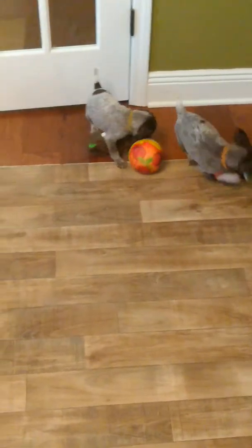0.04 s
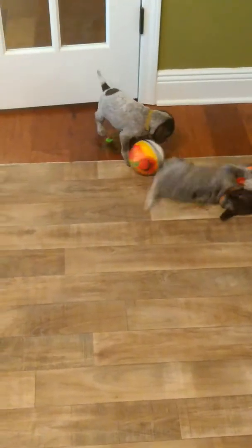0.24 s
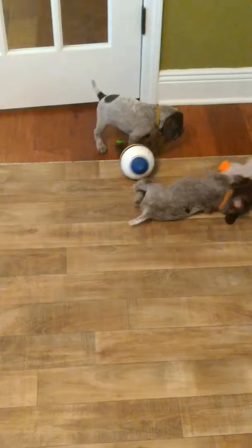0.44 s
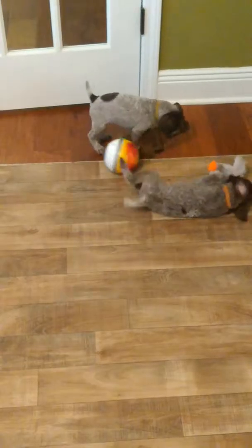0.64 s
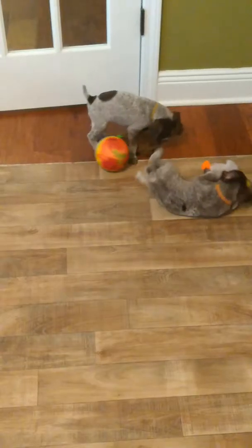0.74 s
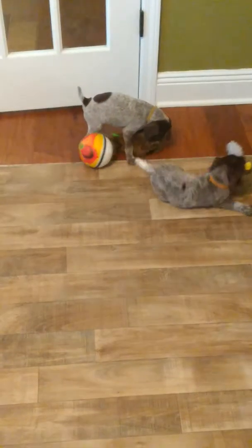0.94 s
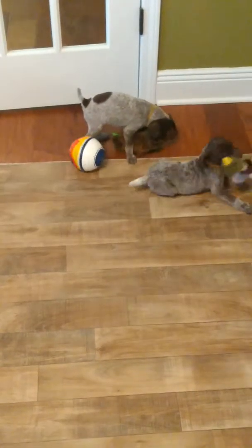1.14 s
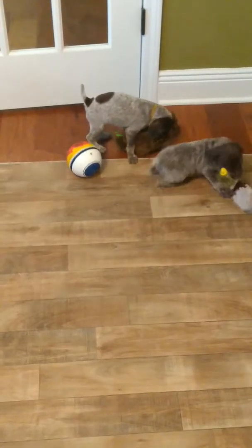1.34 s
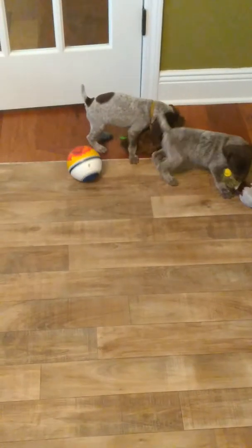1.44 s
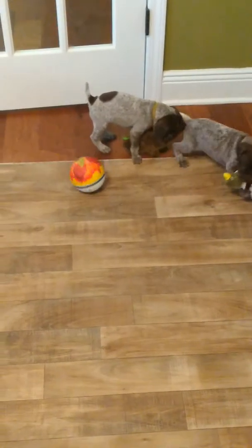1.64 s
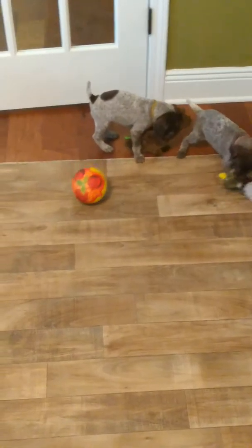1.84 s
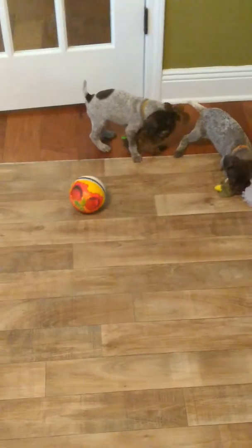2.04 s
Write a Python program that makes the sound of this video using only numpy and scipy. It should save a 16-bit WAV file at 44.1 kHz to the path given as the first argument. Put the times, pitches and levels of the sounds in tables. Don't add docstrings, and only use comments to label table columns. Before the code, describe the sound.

Puppies' claws tick and scuffle over a hard indoor floor, a hollow toy knocking once in a lively room.

```python
import sys
import numpy as np
from scipy import signal
from scipy.fft import rfft, irfft
from scipy.io import wavfile

SR = 44100
rng = np.random.default_rng(int(sys.argv[2]) if len(sys.argv) > 2 else 0)


def put_to_file(sound):
    columns = np.atleast_2d(sound).T
    safe = np.clip(columns, -1, 1)
    whole_steps = np.round(safe * 32767)
    wavfile.write(sys.argv[1], SR, whole_steps.astype(np.int16))


def to_linear_factor(level_db):
    exponent = np.asarray(level_db, float) / 20
    return 10 ** exponent


N = 92610

# start [s], claw peak [dB], pad level [dB], fizz level [dB], pad pitch [Hz].
PAW_CONTACTS = [(.0791, -30.5, -37, -55, 557), (.1066, -37, -42, -44.5, 850), (.111, -41, -58, -59, 450),
                (.2202, -30, -35, -47.5, 517), (.225, -49, -43, -45, 307), (.2792, -60, -39, -65, 395),
                (.3175, -33, -48, -46.5, 610), (.322, -35, -48, -49, 513), (.352, -36.5, -62, -69, 500),
                (.9736, -35.5, -55, -64, 390), (.9765, -36.5, -60, -57, 400), (.9935, -36, -68, -52.5, 412),
                (1.227, -31.5, -30.5, -48, 350), (1.5632, -53, -55, -82, 540),
                (1.6318, -47, -40.5, -74, 450), (1.6713, -27.5, -31, -44, 475),
                (1.6818, -25, -45.5, -41, 432), (1.705, -50, -43, -52, 505), (1.74, -44, -45, -69, 650),
                (1.802, -36, -50, -48, 540)]
# frequency [Hz], level [dB], t60 [s].
CLAW_MODES = [(1610, -7, 0.0032), (1970, -12, 0.0025), (2867, -1.5, 0.004), (3148, 7, 0.0023),
              (4560, -2.5, 0.0028), (5620, -4, 0.0021), (6770, -17.5, 0.0024)]
# start [s], level [dB].
KNOCK_BLOWS = [
    (.3508, -19.5),
    (0.3539, -11.5),
    (0.3557, -9),
    (.3735, -17),
    (.382, -41),
    (.389, -18.5),
    (.397, -21),
    (.404, -20.5),
    (.412, -21),
    (.429, -21),
]
# frequency [Hz], level [dB], t60 [s].
BOARD_MODES = [(151, -34, 0.46), (296, 1, 0.36), (354, -32, 0.15), (376.3, -7, 0.5), (413.4, 7, 0.14),
               (562, -33, 0.29), (686, -8.5, 0.58), (700, -27, 0.11), (885, -10, 0.08), (1220, -18, 0.49),
               (1280, -29, 0.43), (1270, -56, 0.66)]
# start [s], level [dB], pitch [Hz], t60 [s].
SMALL_CONTACTS = [
    (1.4272, -35, 520, .014),
    (1.4276, -46, 850, .006),
    (1.428, -49, 1250, .006),
    (.332, -40, 5250, .012),
    (1.683, -37, 2900, .014),
    (.4165, -40, 3060, .008),
    (.222, -41, 220, .03),
    (.36, -41, 152, .12),
    (1.083, -46, 230, .03),
    (2.042, -46, 300, .03),
]
# time [s], level [dB].
SCUFFLE_EFFORT = [(0, -53), (.04, -50.5), (.07, -51), (.29, -49), (.48, -55.5), (.78, -62.5), (.95, -68.5),
                  (1.04, -62), (1.11, -59), (1.2, -66.5), (1.31, -60), (1.45, -65), (1.54, -61),
                  (1.63, -65.5), (1.75, -53), (1.85, -54.5), (1.971, -62.5), (2.1, -74)]
# frequency [Hz], density [dB per Hz].
SCUFF_SPECTRUM = [(200, 1), (600, -5.5), (1500, -2.5), (3000, -1), (5000, -2.5), (7500, -10), (9000, -8.5),
                  (15000, -8.5)]
# frequency [Hz], density [dB per Hz].
AIR_SPECTRUM = [(30, -4), (55, 4.5), (78, -20), (150, 1), (800, -12), (1700, -20), (3000, -20.5),
                (15000, -64)]
# centre [Hz], width [Hz], level [dB].
HUM_BANDS = [(100.8, 12.3, -54), (119.3, 21.4, -59.5), (265.3, 18, -58), (152.4, 9.6, -68)]
# frequency [Hz], t60 [s].
REVERB_TIME = [(150, 0.99), (400, 0.54), (1000, 0.89), (3000, 0.4), (8000, 0.45), (15000, 0.23)]
# frequency [Hz], level [dB].
PORT_CROSS = [(1000, 0), (2200, 2), (4400, -2), (9000, -3), (15000, -14)]
# frequency [Hz], level [dB].
RIGHT_OVER_LEFT = [(35, -9), (70, -6.5), (130, -6.5), (300, -5.5), (2000, 2), (4500, 3.5), (8000, 3),
                   (14000, -0.5)]
DC_OFFSET = [
    [.00785],
    [-.0003],
]


def paws():
    scrapes_per_paw, scrape_s = 12, 0.0036
    s, claw_db, pad_db, fizz_db, pad_hz = np.transpose(PAW_CONTACTS)
    late, size, side = rng.random((len(s), 3, scrapes_per_paw)).transpose(1, 2, 0)

    click_s = s + 0.001228 - scrape_s * np.log(1 - 0.95 * late)
    claw_gain = to_linear_factor(claw_db - 5)
    click_gain = (size + 0.5) * np.sign(side - 0.5) * claw_gain
    near_claws = claw(train(click_s.ravel(), click_gain.ravel()))
    far_claws = claw(train(s, claw_gain))

    fizz_hz, fizz_s = 7200, 0.003
    bright = signal.butter(4, fizz_hz, "high", fs=SR, output="sos")
    fizz = train(s + 0.00099, to_linear_factor(fizz_db + 12.5))
    fizz_envelope = signal.lfilter([1], [1, -np.exp(-1 / (fizz_s * SR))], fizz)
    near_fizz = signal.sosfilt(bright, fizz_envelope * rng.standard_normal(N))
    far_fizz = signal.sosfilt(bright, fizz)

    pads = sum(pad(*touch) for touch in zip(s, pad_db, pad_hz))
    near = near_claws + near_fizz + pads
    far = to_linear_factor(11) * far_claws + to_linear_factor(2.5 + 17.5) * far_fizz + to_linear_factor(3.5) * pads
    return near, far


def claw(clicks):
    return sum((-1) ** k * to_linear_factor(db) * ring(clicks, hz, t60) for k, (hz, db, t60) in enumerate(CLAW_MODES))


def pad(s, db, hz):
    t60 = 0.018
    landing = train([s + 0.00088, s + 0.004028], to_linear_factor(db + 6.5) * np.array([0.4, 1]))
    return ring(landing, hz, t60) - 0.13 * ring(landing, 1.78 * hz, 0.27 * t60)


def knock():
    s, db = np.transpose(KNOCK_BLOWS)
    hard = train(s, to_linear_factor(db) * (-1.) ** np.arange(len(s)))
    softness = signal.butter(2, 990, fs=SR, output="sos")
    blow = signal.sosfilt(softness, hard)
    boards = 0
    for k, (hz, level_db, t60) in enumerate(BOARD_MODES):
        boards = boards + to_linear_factor(level_db - 21) * (-1) ** k * ring(blow, hz, t60)
    body = ring(blow, 482, 0.016) - 0.1 * ring(blow, 696, 0.011) + 0.55 * ring(blow, 1154, 0.004)
    crack = to_linear_factor(-17) * claw(hard)
    return body, boards, crack


def ticks():
    out = 0
    for s, db, hz, t60 in SMALL_CONTACTS:
        swell = ring(ring(train([s], np.ones(1)), hz, t60), hz, t60)
        out = out + peak_one(swell) * to_linear_factor(db)
    return out


def scuffle():
    grains_per_s = 2600
    s, db = np.transpose(SCUFFLE_EFFORT)
    size_db = np.minimum(rng.exponential(1, (2, N)), 5)
    sizes = to_linear_factor(size_db) * rng.standard_normal((2, N))
    grains = sizes * (rng.random((2, N)) < grains_per_s / SR)
    grains = grains + 0.5 * rng.standard_normal((2, N))
    effort = to_linear_factor(4 + np.interp(np.arange(N) / SR, s, db))
    return rms_one(colour(grains, SCUFF_SPECTRUM)) * effort


def room(x):
    t, tail = np.arange(SR) / SR, 0
    edges = 60 * 2. ** np.arange(0, 8.6, 0.5)
    white = rng.standard_normal((2, 2, SR))
    for k, (low, high) in enumerate(zip(edges, edges[1:])):
        t60 = in_hz(REVERB_TIME, np.sqrt(low * high))
        band_pass = signal.butter(2, [low, min(high, 20000)], "band", fs=SR, output="sos")
        band = signal.sosfilt(band_pass, white[k % 2])
        equal_energy = np.sqrt(2 * np.log(1000) / (t60 * SR))
        tail = tail + band * to_linear_factor(-60 * t / t60) * equal_energy
    gap_s = 0.0015
    tail = tail * np.clip(t / gap_s - 1, 0, 1)
    return signal.fftconvolve(x[None], tail, axes=1)[:, :N]


def room_tone():
    out = to_linear_factor(-53.5) * rms_one(colour(rng.standard_normal((2, N)), AIR_SPECTRUM))
    hz = np.fft.rfftfreq(N, 1 / SR)
    for centre_hz, width_hz, db in HUM_BANDS:
        resonance = 1 / (1 + (2 * (hz - centre_hz) / width_hz) ** 2)
        hum = irfft(rfft(rng.standard_normal((2, N))) * resonance, N)
        out = out + to_linear_factor(db) * rms_one(hum)
    return out


def ring(clicks, hz, t60):
    r, w = to_linear_factor(-60 / (t60 * SR)), 2 * np.pi * hz / SR
    return signal.lfilter([0, np.sin(w)], [1, -2 * r * np.cos(w), r * r], clicks + 1e-18)


def train(s, gain):
    at = np.asarray(s) * SR
    i = at.astype(int)
    first = np.bincount(i, gain * (1 - at + i), N + 2)
    second = np.bincount(i + 1, gain * (at - i), N + 2)
    return first[:N] + second[:N]


def in_hz(points, hz):
    p = np.array(points)
    return np.interp(np.log(hz + 1), np.log(p[:, 0]), p[:, 1])


def colour(x, points):
    return irfft(rfft(x) * to_linear_factor(in_hz(points, np.fft.rfftfreq(N, 1 / SR))), N)


def rms_one(x):
    return x / np.sqrt(np.mean(x ** 2) + 1e-20)


def peak_one(x):
    return x / np.abs(x).max()


def scene():
    low_cut = signal.butter(4, 301, "high", fs=SR, output="sos")
    near, far = signal.sosfilt(low_cut, paws())
    body, boards, crack = knock()
    body = signal.sosfilt(low_cut, body)
    direct = to_linear_factor(-1.5) * near + body + boards + ticks()
    reverberant = room(far + crack + to_linear_factor(-4) * body)
    common, other = direct * [[1], [0.5]] + reverberant + scuffle() + room_tone()

    bias, split_hz = 0.32, 910
    difference = bias * common + np.sqrt(1 - bias ** 2) * other
    split = signal.lfilter(*signal.butter(1, split_hz, "high", fs=SR), difference)
    return common + to_linear_factor(0.5) * split * [[-1], [1]]


def low_pass(x):
    return signal.sosfilt(signal.butter(12, 16830, fs=SR, output="sos"), x)


def record(dry):
    lag = 20
    delayed_other = np.pad(dry[::-1], ((0, 0), (lag, 0)))[:, :N]
    x = dry - colour(delayed_other, PORT_CROSS)
    x = x + to_linear_factor(-73) * rng.standard_normal((2, N))

    w = 2 * np.pi * 350 / SR
    x = 0.77 * signal.lfilter([1, w - 1], [1, -0.997], x)
    x = signal.sosfilt(signal.butter(2, 67, "high", fs=SR, output="sos"), x)

    left_tilt = [(hz, -db / 2) for hz, db in RIGHT_OVER_LEFT]
    right_tilt = [(hz, db / 2) for hz, db in RIGHT_OVER_LEFT]
    x = np.array([colour(x[0], left_tilt), colour(x[1], right_tilt)])
    top_cut = signal.ellip(10, 0.5, 32, 15950, fs=SR, output="sos")
    x = signal.sosfilt(top_cut, x) + DC_OFFSET
    return low_pass(x)


dry = scene()
out = record(dry)
put_to_file(out)
```